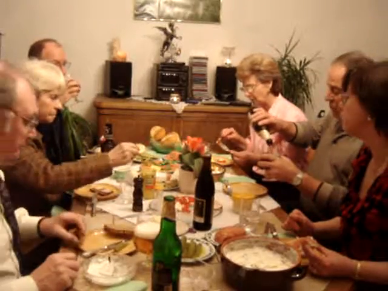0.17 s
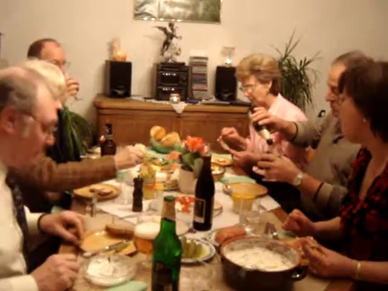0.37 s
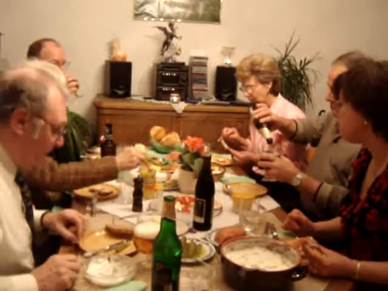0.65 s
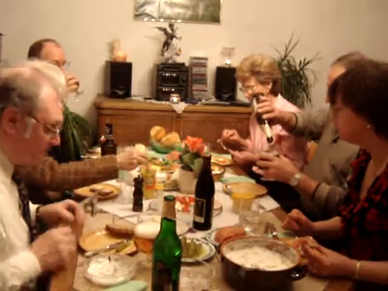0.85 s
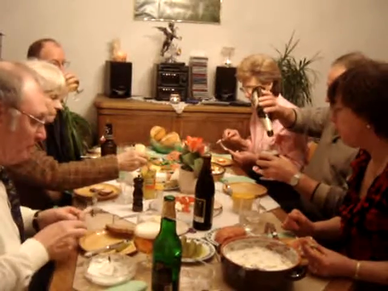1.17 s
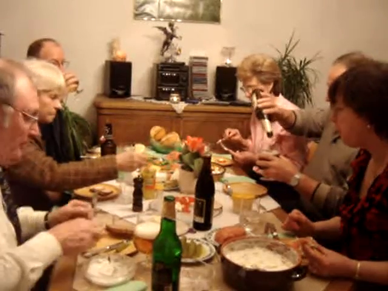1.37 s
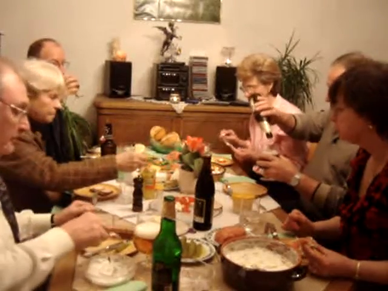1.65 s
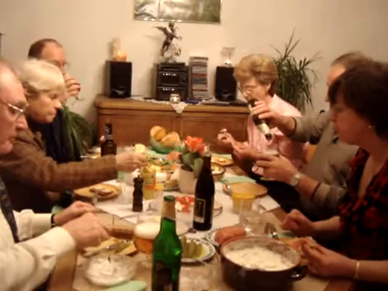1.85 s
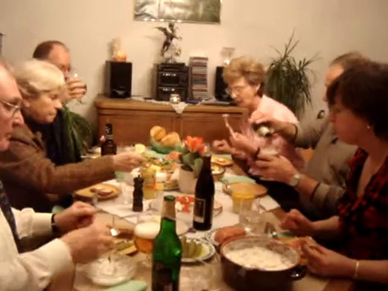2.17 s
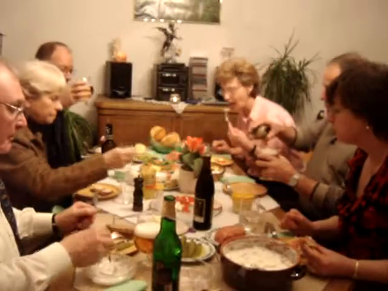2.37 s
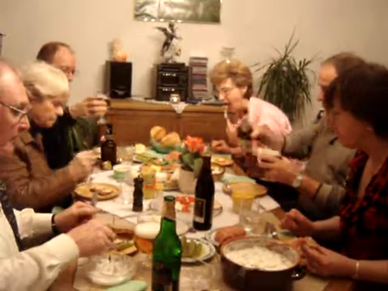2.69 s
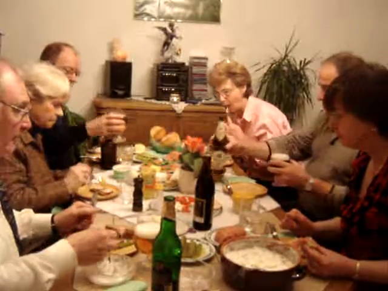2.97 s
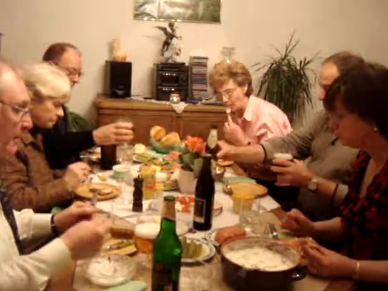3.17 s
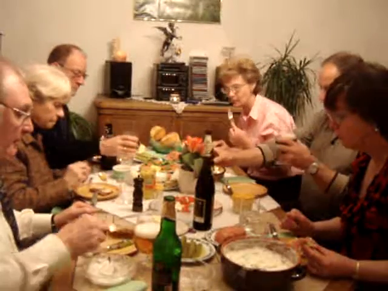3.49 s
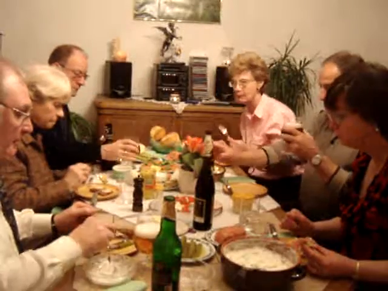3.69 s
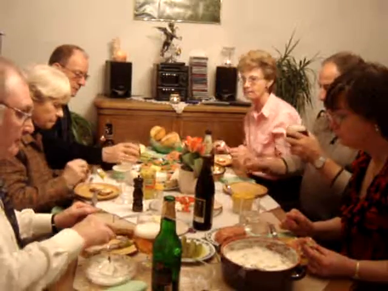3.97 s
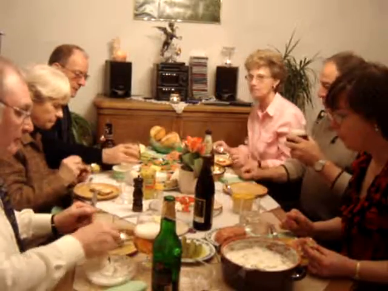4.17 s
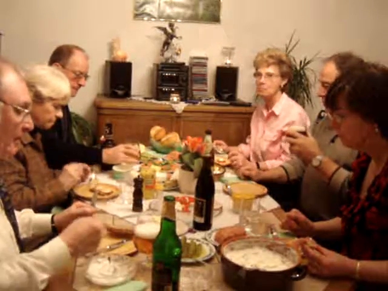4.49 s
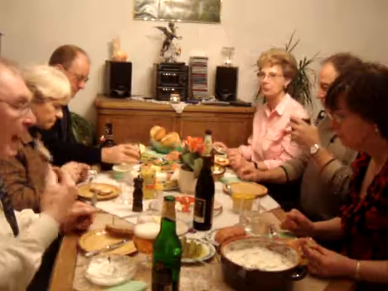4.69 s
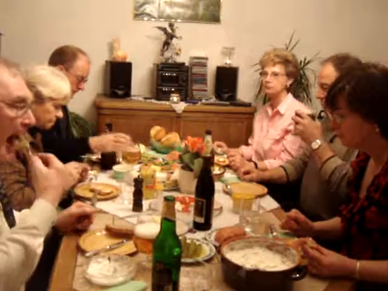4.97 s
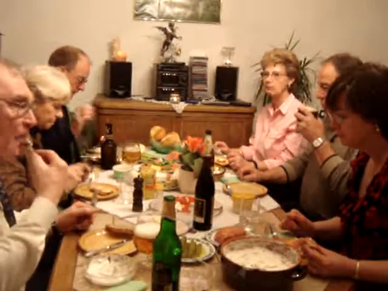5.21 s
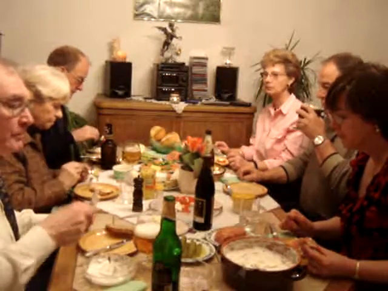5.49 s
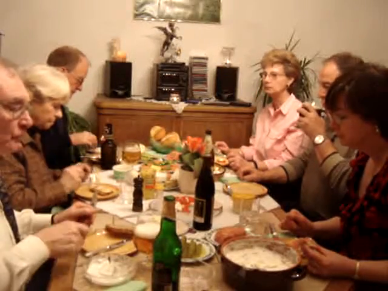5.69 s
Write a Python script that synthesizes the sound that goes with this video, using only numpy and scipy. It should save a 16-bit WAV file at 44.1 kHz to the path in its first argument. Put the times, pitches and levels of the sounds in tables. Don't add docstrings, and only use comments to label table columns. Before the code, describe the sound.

Close small camera microphone at a dinner table in a furnished room. A bright tumble of cutlery on a plate opens at once, ringing plate and bowl briefly. Scattered taps and clinks follow, sparse until a fork touches china. Then a heavy glass knocks hard on wood with a dull thump, and a spoon clinks, with light touches to the end. Soft room hush, hiss and faint motor buzz lie beneath.

```python
import sys
import numpy as np
from scipy import signal
from scipy.fft import irfft
from scipy.io import wavfile

SR = 44100
rng = np.random.default_rng(int(sys.argv[2]) if len(sys.argv) > 2 else 0)


def convert_level_to_amplitude(level_db):
    exponent = np.asarray(level_db, float) / 20
    return 10 ** exponent


def int16_out(signal):
    q = np.round(np.clip(np.atleast_2d(signal).T, -1, 1) * 32767)
    wavfile.write(sys.argv[1], SR, q.astype(np.int16))


N = 257870


def at_hz(points, hz):
    table_hz, value = np.transpose(points)
    return np.interp(np.log(hz), np.log(table_hz), value)


def in_time(curve):
    start_s, level_db = np.transpose(curve)
    return np.interp(np.arange(N) / SR, start_s, level_db)


def rms_one(x):
    return x / np.sqrt(np.mean(x ** 2) + 1e-20)


def drift(rate_hz):
    knots = rng.standard_normal(400)
    return np.interp(np.arange(N) / SR * rate_hz, np.arange(400), knots)


def high_pass(x, order, hz):
    return signal.sosfilt(signal.butter(order, hz, "high", fs=SR, output="sos"), x)


BAND_EDGES = 25 * 2 ** np.arange(0, 8.9, .4)


def bands(size):
    white = rng.standard_normal((2, size))
    for k, (low, high) in enumerate(zip(BAND_EDGES, BAND_EDGES[1:])):
        band_pass = signal.butter(2, [low, high], "band", fs=SR, output="sos")
        yield np.sqrt(low * high), signal.sosfilt(band_pass, white[k % 2])


def coloured(spectrum, size):
    return rms_one(sum(convert_level_to_amplitude(at_hz(spectrum, min(hz, 9200))) * band for hz, band in bands(size)))


def ring(clicks, hz, t60):
    decay = convert_level_to_amplitude(-60 / (max(t60, .002) * SR))
    turn = 2 * np.pi * hz / SR
    return signal.lfilter([0, np.sin(turn)], [1, -2 * decay * np.cos(turn), decay * decay], clicks + 1e-18)


def strike(hits, modes, vary_db, focus_db=0.):
    hits, out = np.array(hits), np.zeros(N + SR)
    at = (hits[:, 0] * SR).astype(int)
    first, last = at.min(), at.max() + SR
    chance = rng.standard_normal((len(at), 2, len(modes)))
    for k, (hz, level_db, t60) in enumerate(modes):
        octaves_off = np.abs(np.log2(hz / np.abs(hits[:, -1])))
        click_db = hits[:, 1] + level_db - focus_db * octaves_off + vary_db * chance[:, 0, k]
        clicks = np.zeros(last - first)
        clicks[at - first] = convert_level_to_amplitude(click_db) * np.sign(chance[:, 1, k])
        out[first:last] += ring(clicks, hz, t60)
    return out[:N]


# pitch_hz, t60_s
ROOM_DECAY = [(100, 0.45), (300, 0.44), (700, 0.32), (2000, 0.29), (5000, 0.32), (10000, 0.083)]


def room(x, wet_db, build_s=0.0022):
    t = np.arange(SR // 2) / SR
    tail = sum(band * convert_level_to_amplitude(-60 * t / at_hz(ROOM_DECAY, hz)) for hz, band in bands(len(t)))
    tail *= np.clip(t / build_s - .5, 0, 1) / np.sqrt(np.sum(tail ** 2))
    return x + convert_level_to_amplitude(wet_db) * signal.fftconvolve(x, tail)[:N]


# pitch_hz, level_db (per Hz)
ROOM_TONE = [(15, -43), (25, -11), (111, -1), (150, -4), (184, -4.5), (321, 0), (346, -4), (383, -10),
             (424, -3), (1290, -10.5), (2250, -13.5), (2550, -14), (8160, -19), (9730, -22.5), (10500, -41),
             (13600, -71), (22000, -120)]
# start_s, level_db
STIRRING = [(0.45, -53.5), (0.78, -58.5), (2.5, -58), (2.89, -52.5), (3.14, -60), (3.46, -52),
            (3.74, -60.5), (4.0, -57), (5.85, -61)]
# pitch_hz, level_db (rms)
MOTOR_TONES = [(120, -68), (180, -66.5), (240, -73), (350, -61), (8000, -82.5)]


def hush():
    t = np.arange(N) / SR
    throb = 1 + 0.11 * np.cos(2 * np.pi * 59.94 * t) + 0.1 * np.cos(2 * np.pi * 140.0 * t)
    stir_db = in_time(STIRRING)
    stir_db = stir_db - np.median(stir_db)
    stir = convert_level_to_amplitude(stir_db)
    rumble = convert_level_to_amplitude(0.49 * stir_db + 0.93 * (t - t.mean()) + 1.5 * drift(3.6))
    shared, still = drift(4.52), 0
    for hz, band in bands(N):
        low = 1 / (1 + (hz / 900) ** 2)
        swell = rumble if hz < 140 else 1 - low + low * stir
        level_db = at_hz(ROOM_TONE, min(hz, 9200)) + 0.52 * shared + 0.34 * drift(3.9)
        still = still + convert_level_to_amplitude(level_db) * band * swell
    tones = sum(convert_level_to_amplitude(level_db - 1.5 + 1.16 * drift(7.9)) * np.sin(2 * np.pi * hz * t)
                for hz, level_db in MOTOR_TONES)
    return convert_level_to_amplitude(-52.5) * rms_one(still) * throb + tones


# start_s, level_db (peak), pitch_hz (centre)
METAL_TAPS = [(0.380, -35.5, 2687), (0.535, -41, 1496), (0.572, -42.5, 2220), (0.643, -40.5, 2350),
              (0.702, -37, 1315), (0.725, -36.5, 1586), (0.745, -38, 1507), (0.762, -44, 2000),
              (1.005, -47, 2990), (1.660, -49, 2540), (2.734, -44, 3010), (4.023, -45, 2520),
              (4.050, -42.5, 1085), (4.229, -45, 1580), (4.400, -42.5, 2980), (5.35, -49, 2270),
              (5.641, -35.5, 2020), (5.680, -43.5, 590)]
# start_s, level_db (peak), pitch_hz (centre)
DRY_SNAPS = [
    (1.203, -39, 2980),
    (2.990, -36.5, 3320),
    (4.107, -40, 4600),
    (4.874, -42, 3540),
]
# start_s, level_db (peak), pitch_hz (centre)
LIGHT_CLINKS = [(0.689, -41, 1640), (0.784, -52, 1790), (1.995, -53, 1490), (2.249, -47, 1570),
                (3.175, -43.5, 3520), (4.398, -34.5, 2000), (4.515, -41, 4800), (4.525, -37.5, 2044),
                (5.571, -48, 2730), (5.665, -44, 3120)]
# start_s, level_db (peak), pitch_hz (centre)
CLOTH_BUMPS = [
    (4.350, -38.5, 250),
    (4.425, -44.5, 275),
    (4.574, -46, 250),
    (5.650, -37, 439),
    (0.522, -49, 298),
    (0.708, -37, 606),
]
# start_s, level_db (peak), pitch_hz (first centre), touches (count)
DISH_SETTLES = [
    (2.831, -35, 1252, 5),
    (4.145, -40, 904, 5),
]
# start_s, level_db (peak), pitch_hz, t60_s
RIM_PINGS = [(0.575, -45.5, 777, 0.25), (0.382, -40, 1435, .06), (0.452, -42.5, 1400, 0.034),
             (0.563, -46, 8000, 0.021), (1.850, -59, 2370, .1), (1.950, -52, 2354, .08),
             (2.149, -43.5, 2385, 0.042), (2.220, -53, 8100, .03), (2.834, -52, 1944, 0.086),
             (4.108, -52, 4000, 0.1), (4.833, -55, 2320, .05)]


def touches():
    tap, snap = (.7, 0.019, -6.5), (0.99, 0.0085, -16)    # spread_oct, t60_s, room_db
    clink, bump = (.25, 0.019, -9.5), (0.546, 0.036, -12.5)
    gap_s, loss_db, fall_oct = 0.022, 2.2, 0.583
    settling = [(s + gap_s * k, db - loss_db * k, hz * 2 ** (-fall_oct * k))
                for s, db, hz, count in DISH_SETTLES for k in range(round(count))]
    found = [(s, db, hz, 0.039, t60, -11) for s, db, hz, t60 in RIM_PINGS]
    kinds = [(METAL_TAPS, tap), (DRY_SNAPS, snap), (LIGHT_CLINKS, clink), (CLOTH_BUMPS, bump), (settling, bump)]
    for rows, kind in kinds:
        found += [(*row, *kind) for row in rows]
    return found


def ticks():
    dry, wet = np.zeros(N), np.zeros(N)
    rows = touches()
    chance = rng.standard_normal((len(rows), 3, 36))
    t = np.arange(SR // 5) / SR
    even = np.linspace(-1.5, 1.5, 36)
    for (s, peak_db, hz, spread, t60, wet_db), (place, size, phase) in zip(rows, chance):
        spot = even + 0.05 * place
        pitches = np.minimum(hz * 2 ** (spread * spot), 9800)
        waves = np.sin(2 * np.pi * (pitches[:, None] * t + phase[:, None]))
        sound = convert_level_to_amplitude(3 * size - 5 * spot ** 2) @ waves
        sound *= convert_level_to_amplitude(-60 * t / max(t60, .002)) * np.minimum(t / (.0006 + t60 / 12), 1)
        sound *= convert_level_to_amplitude(peak_db) / np.abs(sound).max()
        i = int(s * SR)
        dry[i:i + len(t)] += sound[:N - i]
        wet[i:i + len(t)] += convert_level_to_amplitude(wet_db) * sound[:N - i]
    return dry - wet + room(wet, wet_db=6)


def contact(x, length_s):
    share = np.linspace(0, 1, 513)
    delay = length_s * (.5 - .5 * np.cos(7 * np.pi * share))
    spread = irfft(np.exp(-1j * np.cumsum(delay) * np.pi * SR / 512))
    return signal.fftconvolve(x, spread[:512])[:N]


def chatter(hits):
    gaps = .005 * np.cumsum(rng.uniform(.6, 1.4, (len(hits), 4)), axis=1)
    return [(s + gap, db - 2.5 * (k + 1))
            for (s, db), row in zip(hits, gaps) for k, gap in enumerate(row)]


# start_s, level_db (peak)
FORK_HITS = [
    (2.733, -34),
    (2.748, -42),
]
# pitch_hz, level_db, t60_s
FORK_PLATE = [(1710, -8, .03), (2040, 1, 0.018), (2280, -0.5, 0.043), (3780, -11, .03), (5039, -8, 0.052),
              (5220, -9, .05), (5460, -1.5, 0.04), (5660, -7, 0.033), (6840, -5, .025), (7660, -10, 0.039),
              (9300, -5.5, 0.022), (9600, -18, 0.024)]
# start_s, level_db (peak)
SPOON_HITS = [
    (4.0217, -33),
    (4.107, -45),
]
# pitch_hz, level_db, t60_s
SPOON_DISH = [(1925, -2.5, 0.083), (2160, 2.5, 0.021), (2370, -5, 0.043), (3150, -23, 0.06),
              (5040, -6, 0.043), (5190, -11, 0.031), (5376, -7, 0.046), (7800, -23, .04),
              (9100, -17, 0.022)]


def fork_and_spoon():
    first = convert_level_to_amplitude(-5) * strike(FORK_HITS, FORK_PLATE, vary_db=6.5)
    first += convert_level_to_amplitude(-3.5) * strike(SPOON_HITS, SPOON_DISH, vary_db=-4.5)
    again = strike(chatter(FORK_HITS), FORK_PLATE, vary_db=0.0)
    again += strike(chatter(SPOON_HITS), SPOON_DISH, vary_db=2.0)
    return room(contact(first + convert_level_to_amplitude(-3.5) * again, 0.0017), wet_db=-7.5)


# start_s, level_db (peak), pitch_hz (most excited)
TUMBLE = [(.002, -14, 3800), (.015, -15, 3400), (.030, -17, 3800), (.049, -15, 1900), (.056, -14, 3800),
          (.069, -14, 2000), (.0893, -6, 2300), (.101, -7, 2150), (.108, -9, 2400), (.122, -18, 2400),
          (.135, -20, 1000), (.165, -19, 2300), (.178, -22, 2300)]
# pitch_hz, level_db, t60_s
PLATE_MODES = [(580, -3.5, 0.43), (730, -5, 0.086), (1080, -17, 0.57), (1500, -22, 5.0), (1660, -7, 0.11),
               (1996, -27, 0.35), (1916, 0, 0.32), (2170, -8, 0.88), (2160, -10, 0.47), (2376, 0, 0.29),
               (2590, -15, 0.48), (2800, -21, 0.7), (3260, -4, 0.45), (3110, -10.5, 0.61),
               (3640, -18, 0.48), (3900, -3.5, 0.54), (3720, -3, 1.8), (3970, -10, 0.232),
               (5220, -0.5, 0.22), (5100, -17.5, 0.2), (5400, -48, 0.43), (5640, 0, 0.15),
               (6498, -26, 0.12), (6880, -8, 0.38), (7790, -8, 0.12), (7500, -9, 0.48), (8640, -42, 0.14),
               (9500, -6.5, 0.3)]
# pitch_hz, level_db, t60_s
BOWL_MODES = [(494, -38, 0.55), (552, -37, 0.79), (786.6, -40, 0.96), (1054, -43, 0.3), (1096, -39.5, 0.78),
              (1400, -40, 0.85), (1938, -25.5, 0.1), (3250, -36, 0.15), (3880, -33.5, 0.4),
              (4107, -34.5, 0.55)]
# start_s, level_db
RATTLE_VIGOUR = [(0.0, -14.5), (0.036, -24), (0.106, -18.5), (0.142, -30), (0.166, -23.5), (0.21, -31.5),
                 (0.365, -40), (0.385, -33), (0.4, -40)]
# pitch_hz, level_db (per Hz)
RATTLE_HASH = [(59, -55), (100, -24), (358, -29), (545, -15), (672, 0.5), (1610, 3), (2320, -8),
               (2810, -9.5), (3880, 15), (4610, -32), (5160, -23), (6130, -23), (9500, -18), (12400, -59),
               (20900, -120)]


def clatter():
    damped = [(hz, level_db, min(t60, .4) * 0.091) for hz, level_db, t60 in PLATE_MODES]
    big = convert_level_to_amplitude(-5) * strike(TUMBLE, damped, vary_db=2.5, focus_db=9)
    bowl = convert_level_to_amplitude(1.5) * strike(TUMBLE, BOWL_MODES, vary_db=0.5)
    size = N // 8
    t = np.arange(size) / SR
    contacts = rng.standard_normal((len(damped), size)) * convert_level_to_amplitude(2.5 * drift(80)[:size])
    rung = rms_one(sum(convert_level_to_amplitude(level_db) * ring(c, hz, 0.031)[:size]
                       for c, (hz, level_db, _) in zip(contacts, PLATE_MODES)))
    small = convert_level_to_amplitude(-2.5) * rung + convert_level_to_amplitude(-0.5) * coloured(RATTLE_HASH, size)
    low = signal.sosfiltfilt(signal.butter(3, 2800, fs=SR, output="sos"), small)
    body_db = in_time(RATTLE_VIGOUR)[:size]
    treble_db = body_db - 61 * t
    wash = convert_level_to_amplitude(body_db - 7.5) * rms_one(low) + convert_level_to_amplitude(treble_db - 5.5) * rms_one(small - low)
    wash *= np.clip((.4 - t) / .05, 0, 1)
    return room(big, wet_db=-6.5) + bowl + np.pad(wash, (0, N - size))


# start_s, level_db (peak)
GLASS_HITS = [
    (3.3682, -12),
    (3.3755, -6.5),
    (3.381, -14),
]
# pitch_hz, level_db, t60_s
TABLE_MODES = [(158.4, -17.5, 0.57), (250, -18, 0.2), (310, -21, 0.12), (370, -21.5, 0.18),
               (483.2, -7, 0.13), (540, -12, 0.06), (854, -3.5, 0.079), (900, -7, 0.052),
               (1710, -17.5, 0.052), (2386, -18, 0.098), (3240, -24, 0.17), (3380, -20, 0.051),
               (3990, -24, .15), (3910, -27, .15), (3850, -24.5, 0.15)]
# pitch_hz, level_db (per Hz)
BLOW_CRACK = [(59, -40), (100, -35), (152, -10.5), (191, -18), (296, -12), (500, -1), (690, -17),
              (850, -2.5), (1080, -15.5), (3880, -32), (9500, -46), (12400, -83), (20900, -120)]


def glass():
    t = np.arange(N) / SR - GLASS_HITS[0][0]
    thump = convert_level_to_amplitude(-3.5) * np.cos(2 * np.pi * 680 * t) * np.exp(-(t / .0011) ** 2)
    soft_blow = np.hanning(9) / 4
    modes = signal.lfilter(soft_blow, 1, strike(GLASS_HITS, TABLE_MODES, vary_db=1.5))
    crack = convert_level_to_amplitude(-16.5) * coloured(BLOW_CRACK, N) * (t > 0) * convert_level_to_amplitude(-60 * np.abs(t) / 0.047)
    return thump + room(convert_level_to_amplitude(-5.5) * modes, wet_db=-5) + room(crack, wet_db=0.5)


def scene():
    table = ticks() + fork_and_spoon() + clatter() + glass()
    return (hush() + high_pass(table, 2, 90))[None]


# end_s, length_s, low_hz, high_hz
SILENT_BANDS = [
    (0.562, .022, 6500, 10400),
    (2.731, .028, 5100, 7800),
    (2.731, .028, 9200, 10400),
    (3.025, .023, 6700, 7400),
    (3.364, .016, 20, 10400),
    (4.02, .022, 4700, 5900),
    (4.02, .022, 7200, 8000),
]


def starve(x):
    t = np.arange(N) / SR
    for end, length, low, high in SILENT_BANDS:
        part = signal.sosfiltfilt(signal.butter(4, [low, high], "band", fs=SR, output="sos"), x)
        gate = np.clip(np.minimum(t - end + length, end - t) / 0.0017, 0, 1)
        x = x - (1 - convert_level_to_amplitude(-40)) * gate * part
    hz, s, cells = signal.stft(x, SR, nperseg=256, noverlap=192)
    holes = int(150 * N / SR)
    for when, where, wide, long in rng.random((900, 4))[:holes]:
        row = np.abs(hz - 4300 - 5800 * where) < 100 + 300 * wide ** 3
        cells[:, row] *= 1 - .97 * (np.abs(s - when * s[-1]) < .003 + .008 * long ** 4)
    return signal.istft(cells, SR, nperseg=256, noverlap=192)[1][:, :N]


def low_pass(x):
    return signal.sosfilt(signal.butter(12, 10680, fs=SR, output="sos"), x)


def record(dry):
    band_edge = signal.ellip(10, .3, 70, 10050, fs=SR, output="sos")
    mix = signal.sosfilt(band_edge, starve(dry))
    return low_pass(mix)


dry = scene()
out = record(dry)
int16_out(out)
```